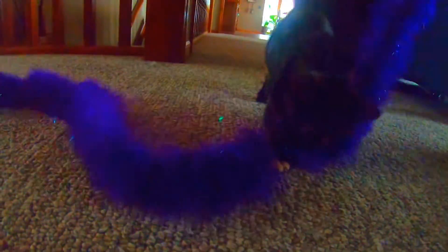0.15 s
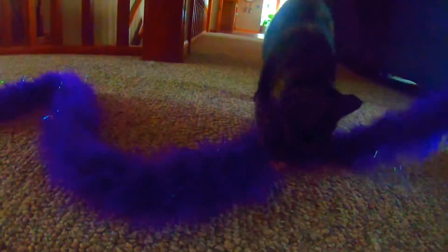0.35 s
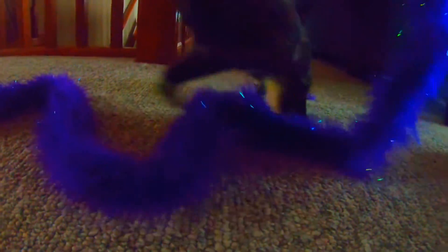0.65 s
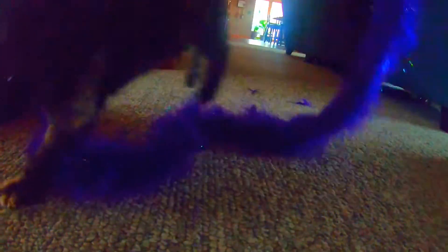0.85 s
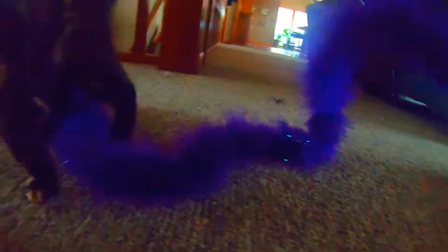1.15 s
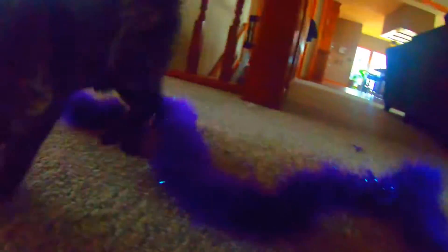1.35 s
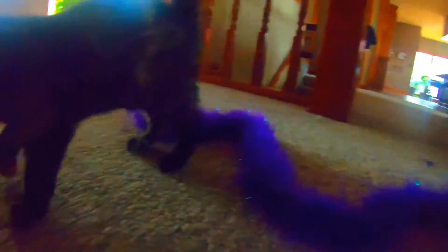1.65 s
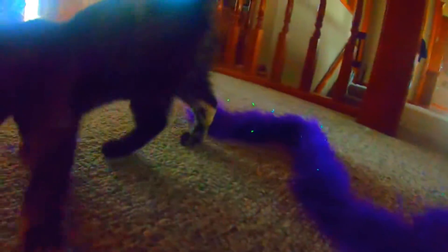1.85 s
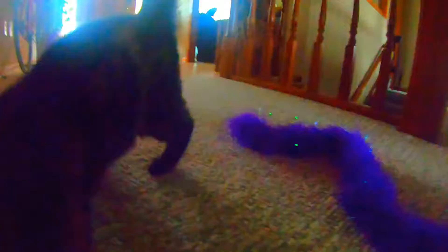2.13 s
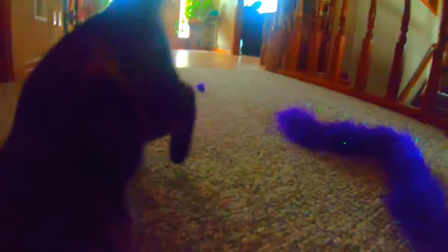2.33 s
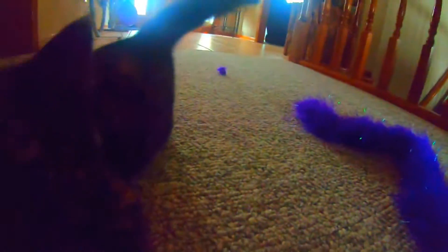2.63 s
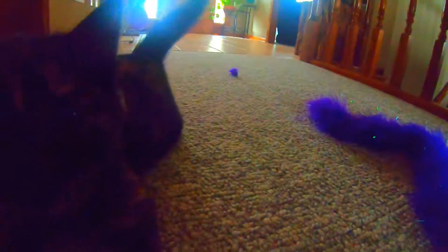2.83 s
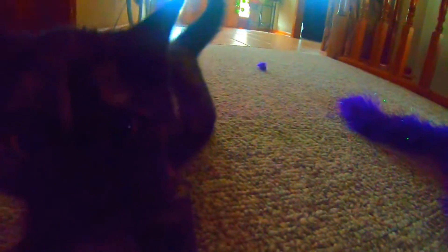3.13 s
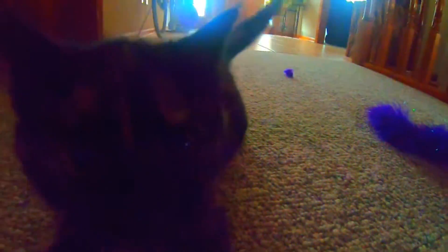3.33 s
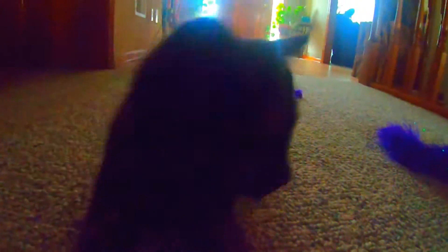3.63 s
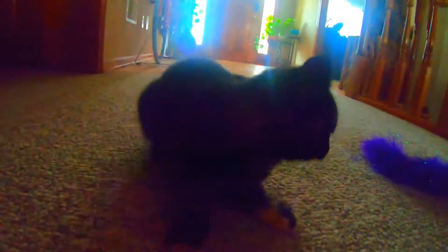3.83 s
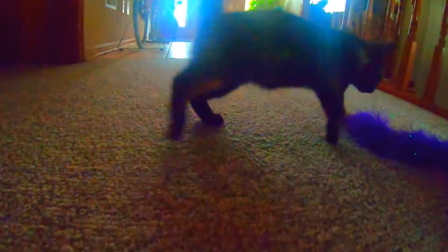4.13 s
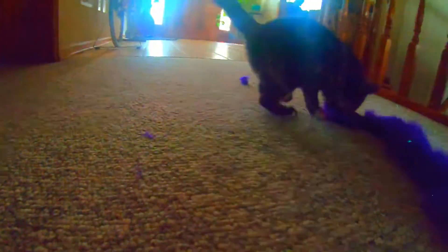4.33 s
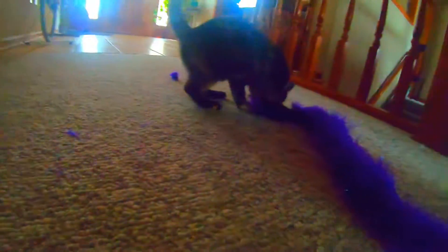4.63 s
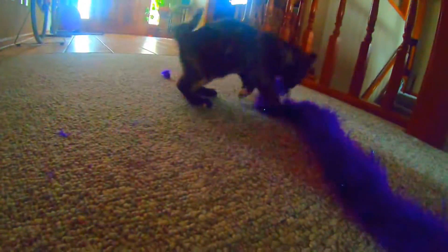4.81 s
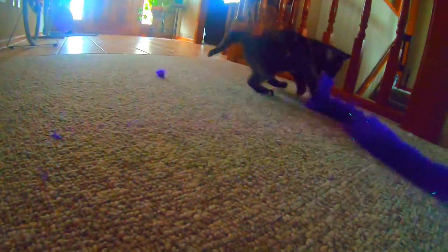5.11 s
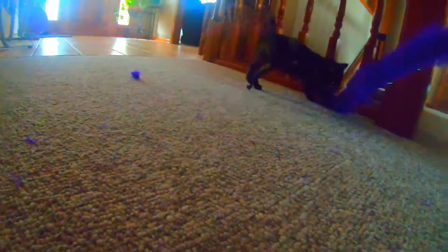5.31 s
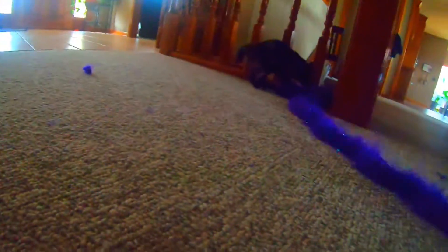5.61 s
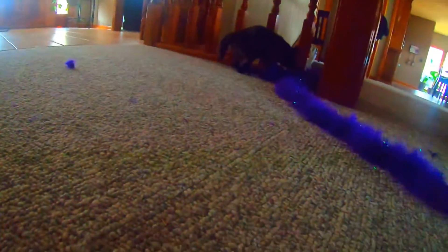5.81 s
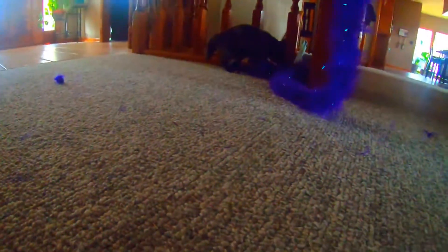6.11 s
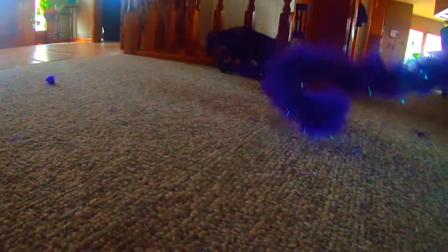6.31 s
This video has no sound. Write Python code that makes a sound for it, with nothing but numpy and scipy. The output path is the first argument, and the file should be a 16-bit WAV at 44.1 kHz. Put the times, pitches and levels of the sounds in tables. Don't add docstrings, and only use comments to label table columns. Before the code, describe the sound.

A low, wavering ventilation hum and soft room tone run throughout a dry carpeted room. From 0.1 to 1.6 s, faint brushing, breathy feather whisks, tiny claw crackles and dull paw pats come and go, with soft thuds around 1.0 to 1.3 s. After a near lull, firmer paw thumps and scratchy claw catches arrive at 2.1 to 2.3 s. From 2.3 to 3.1 s a hard casing slides on the pile beside the microphone: gritty scrapes, clicks and hollow knocks, strongest near 2.7 s. A brief pause, then at 3.35 to 3.5 s a violent shove with a bright crack and rasping edge, followed by rapid rattling judder, peaking again at 3.8 to 3.9 s with low bumps. From 4 to 5 s only light ticks and faint scuffs. At 5.1 to 5.4 s low paw thuds cluster with crisp rustle, then at 5.7 s another soft thud and swish, fading into quiet rustles until 6.4 s.

```python
import sys
import numpy as np
from scipy import signal
from scipy.fft import rfft, irfft
from scipy.io import wavfile
from scipy.ndimage import uniform_filter1d

SR = 44100
rng = np.random.default_rng(int(sys.argv[2]) if len(sys.argv) > 2 else 0)


def to_linear_factor(level_db):
    exponent = np.asarray(level_db, float) / 20
    return 10 ** exponent


def generate_wav(sig):
    pcm = np.round(np.clip(np.atleast_2d(sig).T, -1, 1) * 32767).astype(np.int16)
    wavfile.write(sys.argv[1], SR, pcm)


N = 284896

# start in seconds, hold in seconds, housing ring in dB, fibre hiss in dB.
SLIDES = [(1.7, 0.68, -76, -88), (2.32, 0.062, -51, -54.5), (2.39, 0.068, -56, -66),
          (2.49, 0.018, -49, -54), (2.53, 0.0055, -45.5, -68), (2.56, 0.13, -63.5, -71.5),
          (2.66, 0.006, -52, -63.5), (2.712, 0.024, -46, -56), (2.74, 0.01, -59, -48),
          (2.765, 0.026, -51, -69), (2.82, 0.13, -59, -73), (3.33, .01, -56, -56),
          (3.345, 0.038, -46.5, -51.5), (3.41, 0.0099, -42, -43.5), (3.433, 0.023, -49, -40),
          (3.456, 0.011, -48, -41.5), (3.468, 0.022, -65, -44.5), (3.53, 0.047, -55.5, -64),
          (3.605, 0.014, -50, -63), (3.648, 0.026, -53, -72), (3.7, 0.23, -76, -95),
          (3.855, 0.027, -41.5, -77), (4.85, 0.26, -71, -81), (4.49, 0.34, -66.5, -69.5),
          (4.0, 0.083, -66.5, -85), (4.34, 0.019, -59.5, -84), (4.53, 0.041, -60, -56.5),
          (4.62, 0.063, -68, -58.5), (4.71, 0.087, -72, -58), (4.78, 0.057, -58, -65),
          (5.15, 0.12, -70, -66.5), (5.32, 0.029, -64, -66.5), (6.015, 0.033, -61, -82)]
# start in seconds, snap in dB, knock in dB.
FIRST_SLIPS = [(2.3403, -52, -32), (2.3663, -62, -30.5), (2.398, -39, -59), (2.4286, -55, -39),
               (2.4364, -60, -50), (2.448, -56, -47), (2.5114, -64, -44), (2.5175, -76, -36),
               (2.535, -68, -41), (2.6058, -53, -52), (2.6619, -69, -37), (2.671, -52.5, -65),
               (2.708, -46, -36), (2.7151, -27.5, -26.5), (2.7175, -45, -19.5), (2.7775, -51, -39),
               (2.7871, -58, -26), (2.8148, -49, -34), (2.8362, -53, -38), (2.8539, -60, -40),
               (2.8738, -49, -31.5), (2.8932, -44, -31.5), (2.9093, -52, -38), (2.9234, -56, -33),
               (2.938, -69, -41.5), (2.985, -50, -38.5), (3.0206, -52, -44), (3.033, -62, -44.5),
               (3.1355, -59, -40)]
# start in seconds, snap in dB, knock in dB.
JUDDER_SLIPS = [(3.3653, -40, -27), (3.385, -35, -44), (3.4188, -46, -32), (3.4335, -45, -23),
                (3.4402, -38, -18.5), (3.441, -40, -22.5), (3.4575, -42.5, -28.5), (3.461, -46, -26),
                (3.4455, -22, -50), (3.5274, -58, -37.5), (3.5392, -44, -48), (3.5502, -59, -32),
                (3.5646, -50, -34), (3.58, -40.5, -37), (3.606, -59, -47), (3.6195, -48, -32.5),
                (3.6272, -45, -51), (3.6464, -53, -33.5), (3.6618, -46, -34.5), (3.6705, -50, -43),
                (3.6958, -35, -33), (3.7263, -37, -32.5), (3.749, -34, -41), (3.752, -41, -28),
                (3.7725, -27, -27), (3.7784, -17, -18.5), (3.8105, -38, -31.5), (3.8384, -32, -17.5),
                (3.8434, -22.5, -15), (3.8595, -34, -20), (3.8701, -34, -24), (3.874, -24.5, -21.5),
                (3.8849, -42, -23), (3.9408, -64, -38.5)]
# start in seconds, snap in dB, knock in dB.
SETTLING_TICKS = [(4.0067, -59.5, -50), (4.5068, -50.5, -40), (4.6023, -54, -41.5), (4.6524, -38, -39.5),
                  (4.7855, -41, -43), (4.8207, -48, -47), (5.3108, -65, -34), (5.4127, -70.5, -35),
                  (5.7836, -63, -46), (5.8568, -79, -37.5), (5.9741, -77.5, -32), (6.022, -70, -42),
                  (6.0432, -64, -43), (6.219, -74, -48), (6.3244, -51, -39)]
# start in
# seconds, snap in dB, knock in dB.
MORE_SLIPS = [(3.5335, -53, -42), (3.545, -54, -48), (3.5585, -58, -47), (3.569, -49, -39),
              (3.5745, -50, -40), (3.586, -58, -52), (3.6035, -56, -49), (3.6125, -53, -40),
              (3.6305, -44, -42), (3.6545, -44, -42), (3.6575, -55, -47), (3.666, -59, -31),
              (3.7555, -59, -26), (3.7835, -44, -44), (3.7755, -48, -37), (3.841, -34, -40),
              (3.864, -42, -24), (3.879, -52, -35), (3.89, -66, -34), (2.692, -62, -46),
              (2.7335, -38, -34), (2.798, -58, -47), (2.846, -62, -44), (4.4875, -68, -51),
              (4.538, -62, -39), (4.557, -60, -38), (4.632, -57.5, -47), (4.916, -68, -48),
              (4.966, -68, -51.5), (5.177, -56, -46.5), (5.281, -61, -47)]
# centre in Hz, width in Hz, level in dB.
FLEX_MODES = [(700, 120, -10), (880, 40, -9), (1100, 67, -5.5), (1255, 74, 12.5), (1290, 110, -11),
              (1600, 89, -10), (1980, 300, -13)]
# centre in Hz, width in Hz, level in dB.
LEFT_PORT_MODES = [(2150, 400, -6), (3300, 1000, -14), (4150, 600, -8), (4900, 600, -13), (6500, 600, -10),
                   (8000, 1000, -21), (9800, 1200, -9), (13800, 1200, -20)]
# centre in Hz, width in Hz, level in dB.
RIGHT_PORT_MODES = [(2170, 1600, -5.5), (3500, 700, -6), (4450, 1910, -1), (5760, 1200, -5),
                    (7360, 880, -4), (7870, 390, -5.5), (9960, 1000, -5.5), (12290, 2200, -12.5),
                    (12800, 1100, -15)]
# centre in Hz, width in Hz, left level in dB, right level in dB.
SHELL_MODES = [(1236, 200, 14.5, 13), (1060, 370, -17, -7.5), (2217, 300, -13.5, -7),
               (3000, 590, -12.5, -7), (4260, 510, -9.5, 1), (5700, 500, -14, 7), (6500, 500, -7.5, -5),
               (8300, 700, -12.5, 7.5), (10100, 1200, -5, -13), (12500, 2000, -12, -0.5),
               (13520, 640, -12, -10)]
# centre in Hz, width in Hz, left level in dB, right level in dB.
EDGE_BANDS = [(5370, 440, -15.5, -1), (6500, 350, -6.5, -12.5), (7900, 510, -15.5, -2),
              (9800, 900, -2.5, -12), (11900, 1500, -14.5, -13.5), (13900, 1500, -9.5, -10)]
# start in seconds, hold in seconds, level in dB.
EDGE_STROKES = [
    (3.445, 0.0026, -41),
    (3.456, 0.0073, -41.5),
    (3.467, 0.011, -41),
    (3.486, 0.0045, -48),
    (3.862, 0.023, -62),
]
# centre in seconds, left swing, right swing (both full scale 1),
# swing rate in Hz.
BODY_LURCHES = [(2.771, -0.0055, .035, 40), (2.797, -0.0022, -0.043, 23), (2.965, 0.025, -0.024, 17),
                (3.126, -0.016, 0.048, 17), (3.136, -0.027, 0.014, 200), (3.4302, -0.0077, -0.24, 121),
                (3.436, 0.082, 0.14, 65), (3.443, -0.03, -0.063, 60), (3.462, 0.045, -0.094, 32),
                (3.478, -0.0013, 0.037, 34), (3.788, 0.067, -0.044, 46), (3.803, -0.018, 0.047, 43),
                (3.853, 0.068, -0.072, 86), (3.885, 0.11, -0.071, 70), (3.899, -0.0048, 0.049, 52),
                (3.917, -0.011, -0.038, 16), (3.972, -0.034, 0.0038, 20), (3.994, 0.044, 0.023, 23),
                (4.02, 0.0036, -0.037, 13), (4.086, 0.0015, -0.036, 25), (5.268, 0.073, 0.08, 112),
                (5.228, 0.027, 0.029, 140)]
# start in seconds, peak in dB, floor ring in Hz, t60 in seconds.
PAW_THUDS = [(0.97, -36.5, 155.6, 0.12), (1.078, -37.5, 153, 0.1), (1.132, -35, 108, 0.065),
             (1.296, -42, 162, 0.092), (2.103, -36, 171, 0.056), (2.218, -28.5, 167, 0.03),
             (2.2904, -25, 191, 0.058), (2.299, -33, 92.5, 0.092), (2.725, -32, 169, 0.053),
             (2.798, -31, 88, 0.06), (3.425, -21.5, 74.6, 0.083), (3.836, -29, 176.6, 0.063),
             (3.89, -38, 64.2, 0.14), (4.773, -44, 79.1, 0.17), (5.123, -37.5, 82.8, 0.25),
             (5.168, -28, 82.4, 0.05), (5.2637, -30, 88.6, 0.24), (5.297, -31.5, 85, 0.11),
             (5.335, -33.5, 84.6, 0.31), (5.379, -40, 81, 0.26), (5.417, -35.5, 96, 0.16),
             (5.665, -39.5, 79.2, 0.29), (5.692, -49, 83.4, 0.5)]
# start in seconds, hold in seconds, dull level in dB, broad level in dB.
PAW_PATS = [(.135, 0.014, -58.5, -66.5), (.2, 0.026, -55, -63.5), (.565, 0.0034, -61, -99),
            (.97, 0.06, -73, -67), (2.098, 0.018, -62.5, -88), (2.29, 0.0085, -54.5, -59.5),
            (3.91, 0.14, -79, -69.5), (4.38, 0.031, -63, -77), (5.035, 0.007, -56.5, -82),
            (5.15, 0.074, -59.5, -82), (5.26, 0.031, -61, -80), (5.66, 0.021, -65.5, -90),
            (1.72, 0.01, -63.5, -82), (2.725, 0.0095, -49.5, -49), (4.54, 0.028, -84, -67),
            (5.2, 0.11, -61, -77), (2.3, 0.0099, -74, -75)]
# start in seconds, hold in seconds, swish in dB,
# bright rustle in dB.
BRUSHES = [(.13, 0.014, -65.5, -62.5), (.205, 0.023, -62.5, -69), (.275, 0.019, -65.5, -65),
           (.4, 0.0043, -69, -60.5), (.45, 0.18, -72.5, -72), (.71, 0.009, -76, -103),
           (.75, 0.052, -72, -63), (.825, 0.017, -74, -57), (.87, 0.2, -76, -62.5), (.98, 0.017, -72, -64),
           (1.11, 0.013, -70, -63), (1.16, 0.15, -69.5, -63.5), (1.365, 0.0096, -63.5, -58),
           (1.4, 0.07, -73.5, -66), (1.565, 0.0043, -82, -56.5), (1.82, 0.032, -87, -62.5),
           (2.105, .012, -92, -80), (2.185, 0.011, -67.5, -89), (2.22, 0.023, -65, -60),
           (3.91, 0.12, -70, -101), (4.135, 0.0059, -75, -81), (4.36, 0.045, -73.5, -92),
           (4.44, 0.53, -86, -70.5), (5.035, 0.011, -75, -91.5), (5.16, 0.032, -64, -51.5),
           (5.24, 0.26, -79, -62.5), (5.63, 0.012, -69, -64), (5.71, 0.047, -72, -59.5),
           (5.78, 0.28, -80, -69.5), (6.1, 0.12, -73.5, -59), (6.2, 0.19, -82, -68)]
# time in seconds, left minus right in dB, swish centre in Hz.
KITTEN_PATH = [(0, -7, 2590), (.78, -4, 2300), (.85, -6, 2950), (.92, 13, 2580), (1.12, 6, 2900),
               (1.22, 5, 2470), (1.37, 0, 3100), (1.5, 8, 2780), (2.12, 9, 2460), (2.3, 4.5, 2760),
               (4.0, -2, 2890), (4.4, 1, 2200), (5.2, -1.5, 2600), (5.7, 2, 2140), (6.15, -6.5, 2860)]
# start in seconds, peak in dB, centre in Hz, width in Hz.
CLAW_CATCHES = [(0.134, -52, 2420, 4000), (0.204, -58, 6500, 3000), (.226, -51.5, 870, 1500),
                (0.561, -56, 1440, 2930), (.706, -61, 2500, 800), (0.728, -46.5, 1480, 2920),
                (.765, -54.5, 1820, 700), (.775, -53, 2400, 800), (.769, -45.5, 6500, 6100),
                (0.982, -49, 736, 596), (1.086, -55, 1100, 1820), (2.099, -57, 2000, 3000),
                (2.118, -48, 900, 1920), (2.169, -45, 666, 1430), (2.186, -51, 1500, 3000),
                (2.219, -35.5, 700, 1300), (2.221, -38, 1700, 1520), (2.253, -46.5, 3100, 2000),
                (2.296, -42, 590, 800), (2.733, -30, 900, 1870), (4.131, -48.5, 1960, 2920),
                (4.357, -49, 1390, 1180), (5.033, -43, 885, 1800), (5.034, -68, 3500, 5000),
                (5.221, -48, 2500, 4970), (5.251, -50, 1500, 3000), (5.282, -44.5, 1100, 1500),
                (5.411, -57, 1490, 900), (5.972, -65, 1600, 900), (6.345, -56.5, 790, 400),
                (5.52, -48, 954, 259), (5.706, -46.5, 6600, 3000), (6.139, -56, 2770, 804),
                (6.163, -51.5, 2750, 900)]
# centre in seconds, length in seconds, level in dB, centre in Hz.
FEATHER_PUFFS = [(.215, .02, -67.5, 2940), (0.281, 0.029, -63, 2370), (.322, .008, -69.5, 2500),
                 (.4, 0.018, -62.5, 2480), (4.641, .03, -67, 5000), (4.75, .05, -66.5, 4700),
                 (0.425, 0.0066, -72, 3000), (.712, 0.013, -67, 2520), (.832, 0.027, -65.5, 2750),
                 (1.12, .015, -65.5, 3000), (1.246, 0.031, -70.5, 2530), (1.371, 0.021, -66, 2980),
                 (5.633, 0.022, -67, 2240), (6.038, .02, -73.5, 4300), (6.116, 0.017, -69.5, 2830),
                 (6.261, 0.017, -75, 2820), (5.729, 0.026, -73, 7200)]
# frequency in Hz, level in dB per Hz.
ROOM_COMMON = [(20, 1), (60, -13), (130, -7), (240, -10.5), (600, -31.5), (800, -29.5), (950, -36),
               (2100, -44), (4300, -56.5), (7100, -82.5), (9700, -56), (11500, -74), (15000, -73)]
# frequency in Hz, level in dB per Hz.
ROOM_OPPOSITE = [(20, 3.5), (46, -6), (98, -22), (172, -15), (500, -32.5), (760, -25), (950, -36.5),
                 (1480, -53.5), (3800, -59), (9700, -55.5), (11400, -56.5), (15000, -87)]
# centre in Hz, width in Hz, level in dB rms.
DRONE_MODES = [(37, 24, -50.5), (163.6, 21, -59), (186.33, 6.24, -58.5), (245, 5, -70.5)]
# frequency in Hz, peak in dB.
MOTOR_LINES = [(41.5, -50.5), (185.5, -56.5)]


def housing():
    ring_db, hiss_db = strokes(SLIDES, rise_db_per_s=898, fall_db_per_s=1498, rest_db=[-76, -78])
    fibres = grit(flicker_db=1.5, rate=470)
    other = .8 * fibres + .6 * grit(flicker_db=2.5, rate=300)
    scratch = to_linear_factor(hiss_db + 9) * np.array([other, fibres])
    bend = to_linear_factor(ring_db + 13) * grit(flicker_db=8, rate=110)
    rock = to_linear_factor(ring_db + 6.5) * unit(ring(rng.standard_normal(N), hz=34.3, width=77))
    bump = np.zeros(N)
    for table, length_ms in ((FIRST_SLIPS, 2.87), (JUDDER_SLIPS, 2.16), (SETTLING_TICKS, 1), (MORE_SLIPS, 2.16)):
        for s, snap_db, knock_db in table:
            slip(scratch, bend, rock, bump, s, snap_db, knock_db, length_ms)
    flex = sum(to_linear_factor(db) * ring(bend, hz, width) for hz, width, db in FLEX_MODES)
    flex = lowpass(flex, order=4, hz=2900)
    bump = bump + to_linear_factor(-25) * ring(ring(bend, hz=900, width=280), hz=934, width=250)
    late = np.roll(flex, shift=2)
    left = modes(scratch[0], LEFT_PORT_MODES) + flex + 0.5 * rock
    right = modes(scratch[1], RIGHT_PORT_MODES) - 0.97 * late - 0.99 * rock
    return bump + np.array([left, right])


def slip(scratch, bend, rock, bump, s, snap_db, knock_db, length_ms):
    t = np.arange(3072) / SR - .006
    after = np.maximum(t, 0)
    spread = np.where(t < 0, .00027, .00062) * length_ms
    burst = rng.standard_normal(len(t)) * np.exp(-(t / spread) ** 2)
    burst = 2 * burst / abs(burst).max()
    snap = to_linear_factor(snap_db + 3.5) * burst
    for hz, width, db in ((3266, 360, -4), (2000, 130, 0), (4300, 800, -14.5)):
        snap = snap + to_linear_factor(knock_db + db) * length_ms * ring(burst, hz, width)
    strike = (t > 0) * np.exp(-after / 0.00023) + 0.25 * burst / np.sqrt(length_ms)
    jolt = -np.sin(2 * np.pi * 110 * after) * np.exp(-after / 0.0066)
    drop = np.sin(2 * np.pi * 150 * after) * np.exp(-after / 0.0085)
    add(scratch, s + t[0], snap)
    add(bend, s + t[0], to_linear_factor(knock_db + 15) * strike)
    add(rock, s + t[0], to_linear_factor(knock_db - 0.5) * jolt)
    add(bump, s + t[0], to_linear_factor(knock_db - 16.5) * drop)


def crack():
    out, t = np.zeros((2, N)), np.arange(2048) / SR
    blow = np.exp(-t / .00004) + 0.084 * rng.standard_normal(len(t)) * np.exp(-t / 0.00051)
    for hz, width, left_db, right_db in SHELL_MODES:
        sign = -1 if hz < 2000 else 1
        tone = to_linear_factor(11) * ring(ring(blow, hz, width), hz, 3 * width)
        add(out, 3.4268, np.outer([sign * to_linear_factor(left_db), to_linear_factor(right_db)], tone))
    return out


def singing():
    level_db, = strokes(EDGE_STROKES, rise_db_per_s=1200, fall_db_per_s=1500, rest_db=-110)
    out = np.zeros((2, N))
    for hz, width, *port_db in EDGE_BANDS:
        stutter = grit(flicker_db=3.5, rate=400)
        band = unit(ring(ring(stutter, hz, width), hz, 2 * width))
        out += np.outer(to_linear_factor(port_db), band)
    return to_linear_factor(level_db) * out


def lurches():
    out, t = np.zeros((2, N)), np.arange(8192) / SR - .09
    for s, left, right, hz in BODY_LURCHES:
        swing = np.cos(2 * np.pi * hz * t) * np.exp(-(2.86 * hz * t) ** 2)
        add(out, s + t[0], np.outer([left, right], swing))
    return out


def thuds():
    out, t = np.zeros(N), np.arange(8192) / SR
    push = 1 - np.exp(-(t / 0.0041) ** 2)
    for s, db, hz, t60 in PAW_THUDS:
        fade = np.log(1000) * t / t60
        low = np.sin(2 * np.pi * hz * t) * np.exp(-fade)
        high = 0.55 * np.sin(2 * np.pi * 1.87 * hz * t) * np.exp(-2.5 * fade)
        pat = 0.52 * ring(rng.standard_normal(len(t)), hz=356, width=140) * np.exp(-t / 0.019)
        add(out, s, to_linear_factor(db + 7) * push * (low + high + pat))
    return np.array([1.065 * out, 1.17 * out])


def pats():
    dull_db, broad_db = strokes(PAW_PATS, rise_db_per_s=950, fall_db_per_s=470, rest_db=-100)
    near, left, right = (grit(flicker_db=6, rate=260) for _ in range(3))
    pair = np.array([near + 0.95 * left, near + 0.51 * right])
    dull = ring(ring(pair, hz=476, width=680), hz=500, width=1600)
    broad = ring(ring(pair, hz=2200, width=6000), hz=2200, width=6100)
    return to_linear_factor(dull_db) * unit(dull) + to_linear_factor(broad_db) * unit(broad)


def scuffs():
    swish_db, bright_db = strokes(BRUSHES, rise_db_per_s=353, fall_db_per_s=245, rest_db=-106)
    hz = curves(KITTEN_PATH)[1] * (1 + .03 * walk(8))
    near, left, right = (grit(flicker_db=4, rate=120) for _ in range(3))
    swish, bright = [], []
    for p in (0.12 * near + .5 * left, near + .5 * right):
        swish.append(sweep(p, hz, width=230) + .26 * ring(p, hz=1600, width=4200))
    for p in (0.079 * near + left, 0.052 * near + right):
        rustle = ring(p, hz=4430, width=1800) + 0.75 * ring(p, hz=8830, width=4500)
        bright.append(ring(rustle, hz=6400, width=22000))
    return to_linear_factor(swish_db) * unit(np.array(swish)) + to_linear_factor(bright_db - 8.5) * unit(np.array(bright))


def claws():
    out, t, side_db = np.zeros((2, N)), np.arange(1024) / SR, curves(KITTEN_PATH)[0]
    envelope = t / 0.00094 * np.exp(-t / 0.00045) + 0.034 * np.exp(-t / 0.0095)
    for s, db, hz, width in CLAW_CATCHES:
        burst = rng.standard_normal(len(t)) * envelope
        burst[8] += 0.6
        tick = ring(ring(burst, hz, width), hz, width)
        pan = to_linear_factor(np.array([[.5], [-.5]]) * side_db[int(s * SR)])
        add(out, s, to_linear_factor(db + 2) * pan * tick / abs(tick).max())
    return out


def puffs():
    out, t, side_db = np.zeros((2, N)), np.arange(8192) / SR - .09, curves(KITTEN_PATH)[0]
    for s, length, db, hz in FEATHER_PUFFS:
        noise = rng.standard_normal((3, len(t)))
        air = noise[0] + .5 * noise[1:]
        band = unit(ring(ring(air, hz, width=0.18 * hz), hz, width=0.52 * hz))
        pan = to_linear_factor(np.array([[.5], [-.5]]) * side_db[int(s * SR)])
        add(out, s + t[0], to_linear_factor(db) * pan * band * np.exp(-(t / length) ** 2))
    return out


def room():
    mid, side = room_tone(ROOM_COMMON), room_tone(ROOM_OPPOSITE)
    for hz, width, db in DRONE_MODES:
        mid = mid + to_linear_factor(db) * unit(ring(ring(rng.standard_normal(N), hz, width), hz, 2 * width))
    for hz, db in MOTOR_LINES:
        turns = hz * np.cumsum(1 + 0.00994 * walk(3)) / SR
        mid = mid + to_linear_factor(db + walk(0.69)) * np.sin(2 * np.pi * turns)
    return np.array([to_linear_factor(-0.15) * (mid + side), to_linear_factor(-0.1) * (mid - side)])


def room_tone(table):
    hz, db = np.transpose(table)
    f = np.maximum(np.fft.rfftfreq(N, 1 / SR), 8)
    shape_db = np.interp(np.log(f), np.log(hz), db) - 25
    return irfft(rfft(rng.standard_normal(N)) * to_linear_factor(shape_db), N) * to_linear_factor(1.2 * walk(6))


def ring(x, hz, width):
    return signal.lfilter(*signal.iirpeak(hz, hz / width, fs=SR), x)


def modes(x, table):
    return sum(to_linear_factor(db + 1.2 * walk(12)) * ring(ring(x, hz, width), hz, 2 * width) for hz, width, db in table)


def sweep(x, hz, width):
    out = np.zeros(N)
    for f in np.arange(1900, 3700, 300):
        nearness = np.exp(-((hz - f) / width) ** 2)
        out += nearness * to_linear_factor(2.5 * walk(25)) * ring(ring(x, f, 520), f, 900)
    return out


def lowpass(x, order, hz):
    return signal.sosfilt(signal.butter(order, hz, fs=SR, output="sos"), x)


def strokes(table, rise_db_per_s, fall_db_per_s, rest_db):
    t = np.arange(N // 32 + 1) * 32 / SR
    power = to_linear_factor(2 * np.reshape(rest_db, (-1, 1)))
    for s, hold, *db in table:
        off = rise_db_per_s * np.maximum(s - t, 0) + fall_db_per_s * np.maximum(t - s - hold, 0)
        power = power + to_linear_factor(2 * (np.reshape(db, (-1, 1)) - np.minimum(off, 200)))
    return [np.interp(np.arange(N) / SR, t, 10 * np.log10(p)) for p in power]


def curves(table):
    s, *columns = np.transpose(table)
    return [np.interp(np.arange(N) / SR, s, c) for c in columns]


def walk(rate):
    k = int(SR / rate)
    steps = np.repeat(rng.standard_normal(N // k + 1), k)
    return unit(uniform_filter1d(steps, k)[:N])


def grit(flicker_db, rate):
    return rng.standard_normal(N) * to_linear_factor(2 * flicker_db * np.tanh(walk(rate) / 2))


def unit(x):
    return x / np.sqrt(np.mean(x ** 2))


def add(track, s, piece):
    i = int(s * SR)
    track[..., i:i + piece.shape[-1]] += piece[..., :N - i]


def scene():
    camera = housing() + crack() + singing() + lurches()
    kitten = thuds() + pats() + scuffs() + claws() + puffs()
    return camera + kitten + room()


def roll_off(x):
    return signal.sosfilt(signal.butter(12, 16540, fs=SR, output="sos"), x)


def record(dry):
    dry = .9 * np.tanh(dry / .9)
    dull = lowpass(dry, order=6, hz=10300)
    full = lowpass(dry, order=8, hz=14100)
    return roll_off(dull + 0.24 * (full - dull))


dry = scene()
out = record(dry)
generate_wav(out)
```